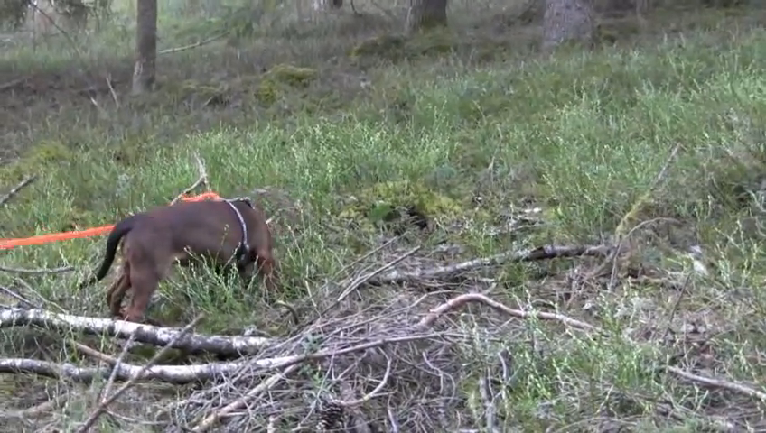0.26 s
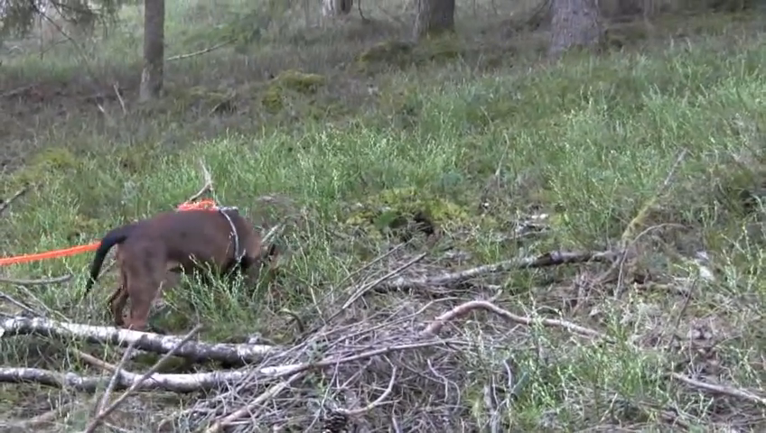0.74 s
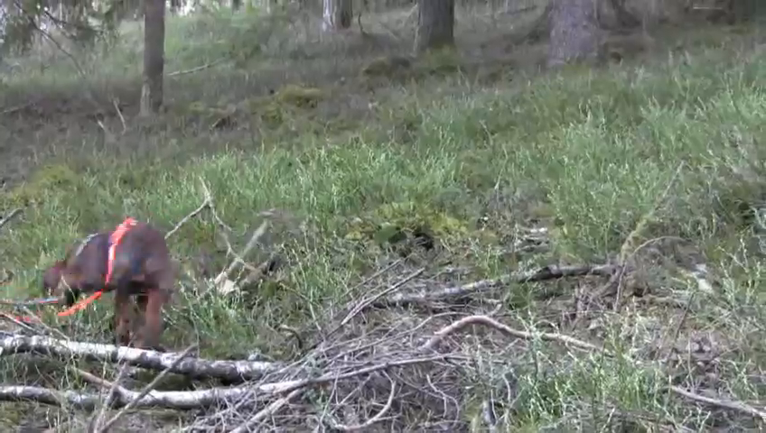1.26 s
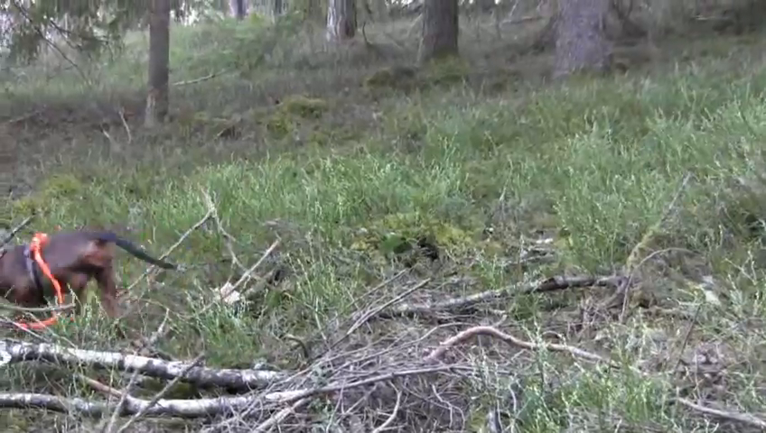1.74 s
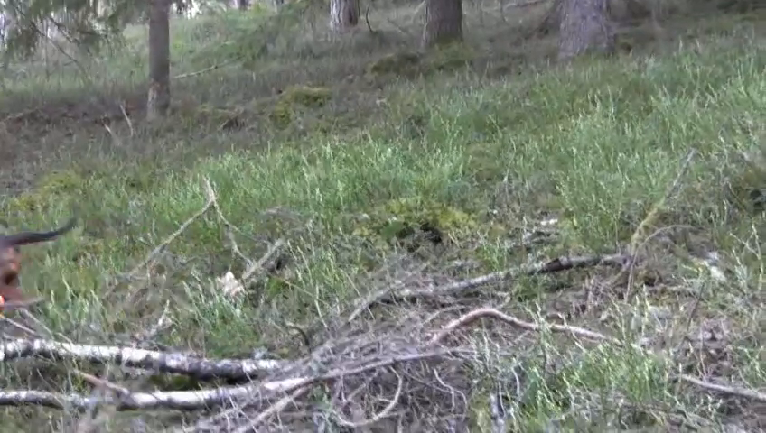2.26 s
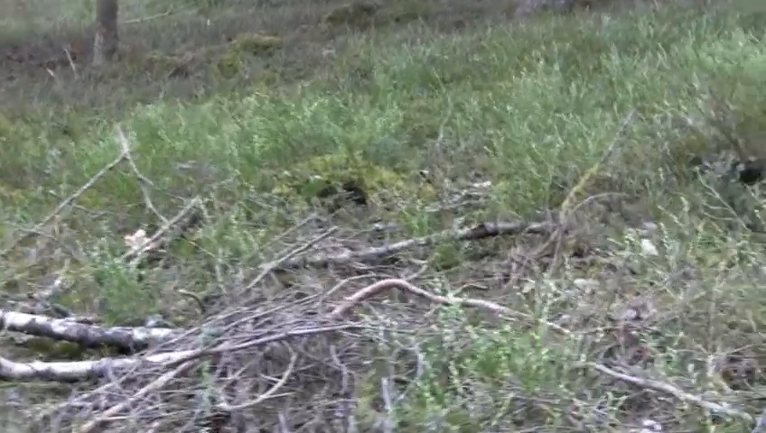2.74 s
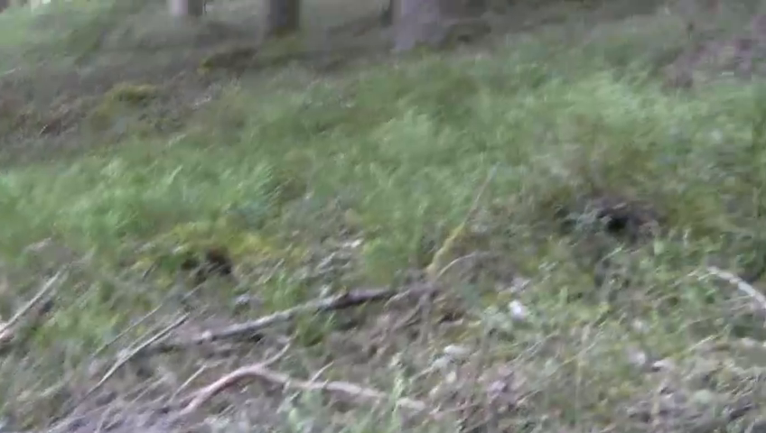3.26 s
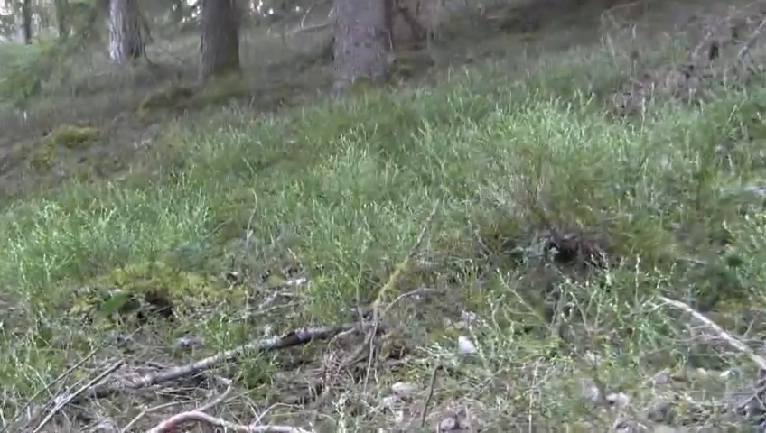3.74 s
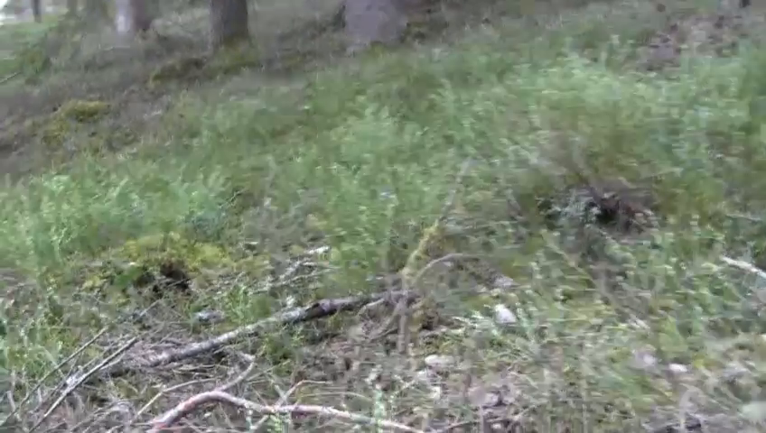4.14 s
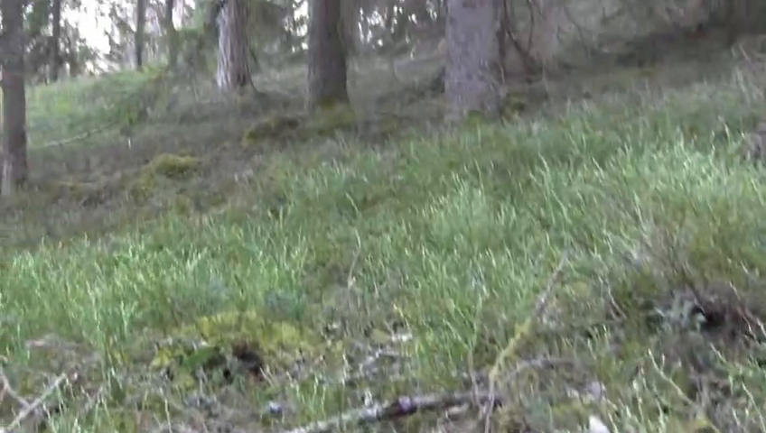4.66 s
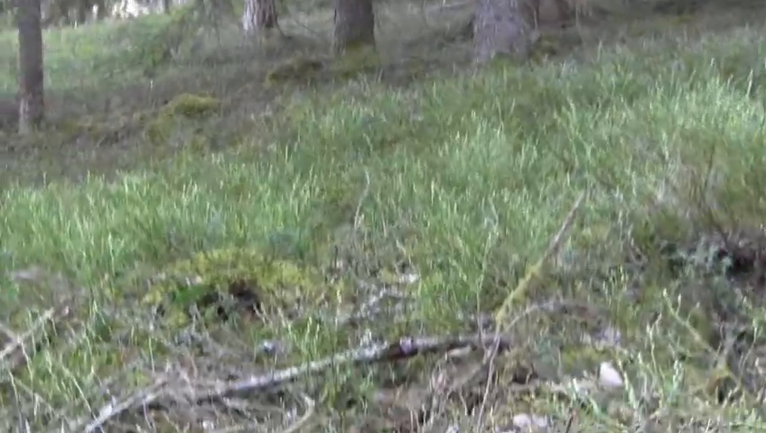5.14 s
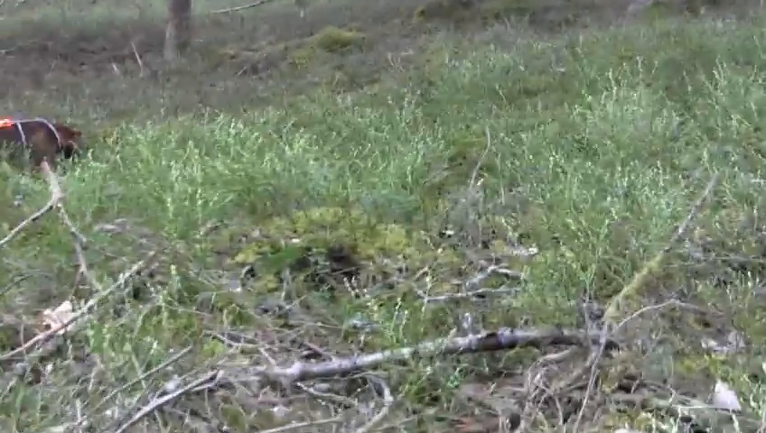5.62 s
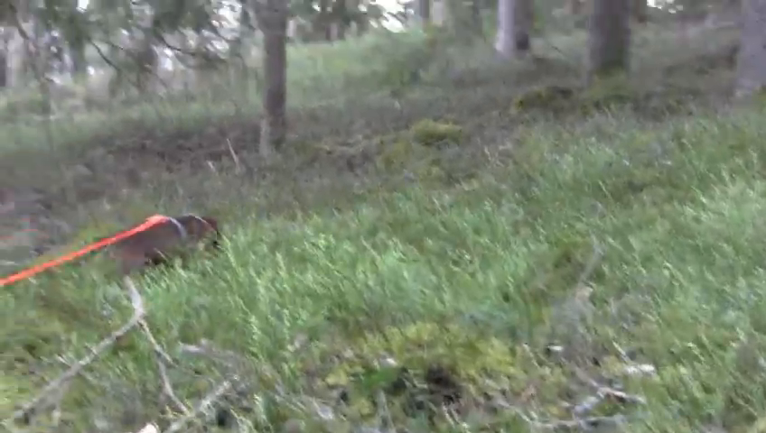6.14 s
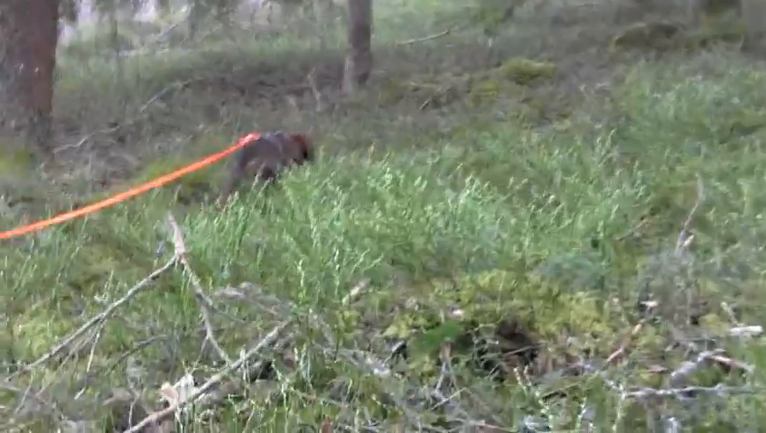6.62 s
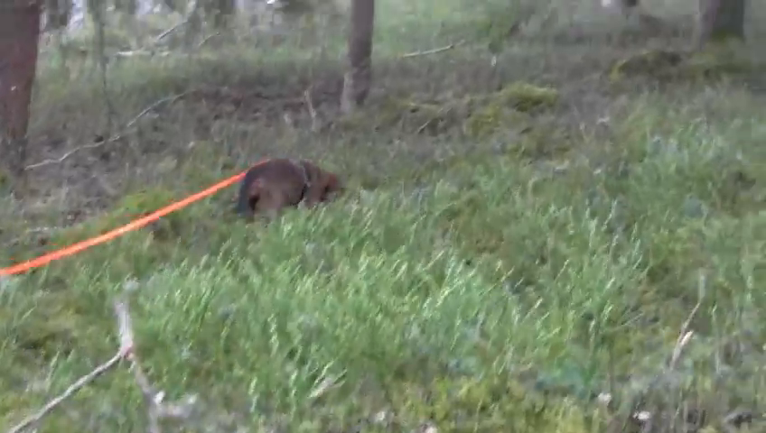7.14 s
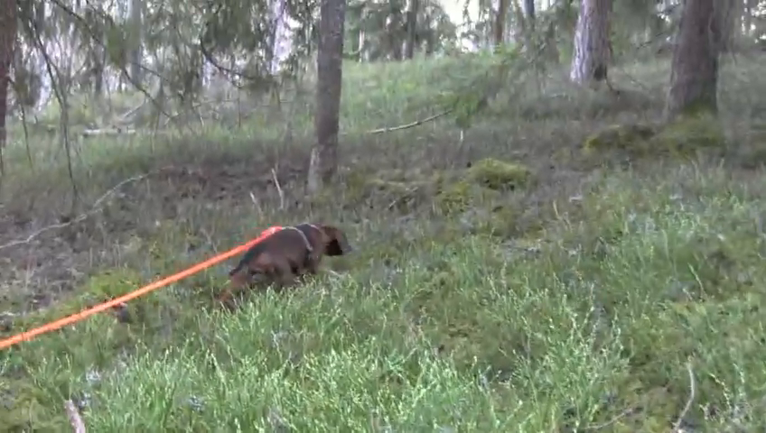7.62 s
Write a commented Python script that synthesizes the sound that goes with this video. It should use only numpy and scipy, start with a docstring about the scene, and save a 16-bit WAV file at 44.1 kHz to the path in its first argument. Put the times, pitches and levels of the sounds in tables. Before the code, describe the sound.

Footsteps push through dry forest undergrowth, with twigs snapping and grass rustling, building to busy, sharp crackles.

```python
"""In dry forest undergrowth, a walker follows a leashed dog. Twigs snap underfoot by brittle
fracture, each exciting a damped resonance. Boots and legs push through brush and grass, which
rustle by friction and many small impacts. Footfalls thud softly and three faint chirps sound
at the start. A far-off roar with a hump just below 1 kHz hangs between the trees."""
import sys
import numpy as np
from scipy import signal
from scipy.fft import rfft, irfft, next_fast_len
from scipy.io import wavfile
from scipy.ndimage import uniform_filter1d

SR = 44100
rng = np.random.default_rng(int(sys.argv[2]) if len(sys.argv) > 2 else 0)


def log_audio(samples):
    """Write samples as a 16-bit WAV file to the path given in sys.argv[1]."""
    # one column per channel
    frames = np.atleast_2d(samples).T
    # limit to full scale, then quantise
    limited = np.clip(frames, -1, 1)
    pcm = np.round(limited * 32767).astype(np.int16)
    wavfile.write(sys.argv[1], SR, pcm)


N = 347830

# Parts of a snap, low to high: a spectrum (frequency [Hz], gain [dB]), then its excitation's T60 [s]
THUMP = [(40, -54), (120, -9), (280, -1.5), (600, -5), (2000, -32)], 0.013
KNOCK = [(250, -25), (700, -0.5), (1300, 1.5), (2000, -3.5), (6000, -51.5)], 0.0083
CRACK = ([(800, -35), (2200, 4), (3400, 3), (4400, -0.5), (6000, 0), (7800, -3.5), (9000, -7),
          (16000, -53)], 0.0065)
SIZZLE = [(3000, -48), (8000, 7), (11500, 5.5), (14000, 0), (16500, -39.5)], 0.0079
def snap(responses, level_db, thump_db, knock_db, sizzle_db, ring_hz):
    """Brittle fracture: tearing fibres excite four broad bands and a damped mode of the stick."""
    t = np.arange(600) / SR
    fibres = rng.standard_normal((2, len(t))) * amp(3.13 * rng.standard_normal(len(t)))
    fibres *= 1 - np.exp(-t / 0.00025)
    fibres *= 1 + 5.0 * np.exp(-t / 0.00032)  # the first fibres break hardest
    ring_cycles, litter_loss_s = 4.2, 0.0035  # the litter cuts a low ring short
    decay = np.exp(-t * ring_hz / ring_cycles - t / litter_loss_s)
    ring = decay * (1 - np.exp(-t * ring_hz * 2)) * np.sin(2 * np.pi * ring_hz * t)
    ring_db = -1.5 + max(0.17 * knock_db, 1.25 * knock_db)  # a hollow stick rings above its knock
    thump, knock, crack, sizzle = responses
    parts = [(thump, THUMP[1], thump_db), (knock, KNOCK[1], knock_db), (crack, CRACK[1], 0),
             (sizzle, SIZZLE[1], sizzle_db), (ring[:512], CRACK[1], ring_db)]
    sound = 0
    for response, t60, part_db in parts:
        part = signal.fftconvolve(fibres * amp(-60 * t / t60), response[None], axes=1)
        sound += amp(part_db) * part / np.linalg.norm(part, axis=1, keepdims=True)
    mid, side = amp(level_db) * sound / abs(sound[0]).max()
    return stereo_pair(mid, amp(-3.5) * side)


# Breaking twigs: (time [s], level [dB], thump [dB], knock [dB], sizzle [dB], ring frequency [Hz]);
# thump, knock and sizzle are relative to the crack
SNAPS = [(0.133, -44.5, 9, -9, -25, 700), (0.249, -45.5, -25, -25, -22, 3300),
         (0.312, -41.5, -28, 0, -9.5, 2330), (0.418, -40, -11, -4, -9, 1900),
         (0.435, -43, -20, -13, -12, 3300), (1.087, -53, -27, -25, 2, 7000),
         (1.213, -46, -23, -20, 0, 6550), (1.348, -45, -27, -8, 0, 2600), (1.559, -44, -32, -24, 14, 8300),
         (1.584, -41.5, -25, -5, -2, 2600), (2.03, -37, -5.5, -6.5, -16, 2070),
         (2.205, -40.5, -26, 0, -15, 1400), (2.227, -44, -25, 5, -25, 1400),
         (2.26, -36.5, -26, -4, -7, 1410), (2.282, -41, -25, 2, -15, 5000),
         (2.314, -45.5, -25, 6, -18, 1350), (2.347, -42.5, 3, 10, -24, 2420),
         (2.387, -43, 4.5, 6, -22, 750), (2.548, -38, -26, -14, -5, 1330),
         (2.5784, -18.5, -51, -21, -9, 5420), (2.5788, -23, -55, -21, -23, 1460),
         (2.65, -38, -9, -5, -13, 2100), (2.681, -32, -14, -10, -10, 1730), (2.773, -32, -14, -1, -6, 1000),
         (2.796, -20, -6.5, -32, -2.5, 830), (2.827, -28, -47, -28, 2, 1230),
         (2.863, -34.5, -5, 4, -13, 990), (3.176, -35, -30.5, -18, 2, 1790),
         (3.254, -37.5, -32, -14, 2, 1250), (3.326, -41, -20, -4, -22, 1850),
         (3.504, -38, -3, -5, -19, 3320), (3.532, -37.5, 2.5, -8.5, -10, 2930),
         (3.595, -21.5, -4.5, -7, -9, 1330), (3.932, -35, -16, -23, -10, 1290),
         (4.05, -28.5, -16, -5, -10, 1740), (4.135, -28.5, 0, -3, -29, 820),
         (4.141, -32.5, -2.5, -10, -21, 1420), (4.279, -27, -22, -11, 5.5, 1010),
         (4.307, -32.5, -11, -9, -14, 2970), (4.372, -31.5, -12, 11, 2.5, 1540),
         (4.546, -26.5, -19, -1, -3, 3500), (4.57, -21, 0, -3, -2.5, 1640), (4.665, -21, -1.5, -7, 2, 5900),
         (4.694, -23, -3, -0.5, 1.5, 2580), (4.721, -26.5, -12, -17, -2.5, 1760),
         (4.766, -31, 2, -7, 5, 6220), (4.776, -18, -2.5, -34, 6.5, 2460),
         (4.779, -16, -7, -1.5, 6.5, 1570), (4.855, -37.5, -24, -12, -7, 2860),
         (4.979, -38, -25, -17, -13, 4430), (5.042, -31, -23, 12, -15, 1930), (5.06, -28, -19, 5, -6, 5600),
         (5.079, -28, -29, -7, -17, 2450), (5.088, -28.5, -32, -15, -18, 1200),
         (5.221, -29, -1, -10, 0.5, 4400), (5.258, -36, -40, -9, -3, 1960),
         (5.292, -29.5, -31, -7.5, -7, 1780), (5.326, -32, -13, -4.5, -4, 1220),
         (5.361, -29, -9, -26, 3.5, 3940), (5.534, -32, -12, -8, 17, 1600),
         (5.603, -36, -22, 17, -23, 2050), (5.748, -33, -14, -1, -26, 3520),
         (5.756, -21, -9.5, -34, -10, 880), (5.776, -26, -24, -5, -1, 6450),
         (5.781, -26.5, 1.5, 0.5, 3, 2900), (5.821, -26.5, -35, -16, 8, 5960),
         (5.824, -29, -40, -10, -17, 3250), (5.907, -25, -30, 0.5, -2.5, 840),
         (6.061, -32.5, -5, 22, -24, 734), (6.07, -31, 7, 6, -28, 880), (6.0786, -24.5, -2, -1.5, -19, 710),
         (6.101, -39, 2, 12, -20, 720), (6.127, -39, 0, 17, -33, 660), (6.27, -34.5, -1, 5.5, -8, 2880),
         (6.48, -25.5, -26, -14, 19, 5350), (6.529, -30, -13, -10, -4, 1370),
         (6.61, -30, -27, -11, 2, 6000), (6.633, -32, -19, -18, 1, 1450), (6.666, -31.5, -14, -9, -5, 5790),
         (6.685, -33, -20, -6, 6, 6000), (6.717, -22, -5, -3.5, 0.5, 4860),
         (6.727, -30, -28, -13, -27, 3270), (6.734, -32, -25, -20, 9, 6500),
         (6.782, -28, -6, -21, 2.5, 5530), (6.791, -30, -29, -5, -6, 2000), (6.824, -32, -7, 1, -7, 1160),
         (6.866, -35, -5, -8, -17, 2660), (6.88, -24, -15, -10, -14.5, 1390),
         (6.887, -27, 1.5, -19, -11, 3000), (6.894, -14, -14, -7.5, -12, 5860),
         (6.909, -34, -9, -24, -26, 2900), (6.934, -26.5, -13, -16, -21.5, 5930),
         (7.002, -28, -16, -26, -21, 634), (7.046, -31.5, 7, 3.5, -26, 720),
         (7.1, -32.5, 3.5, 0, -22, 1030), (7.155, -21.5, -8.5, -0.5, -5.5, 3500),
         (7.257, -38.5, -11, -9, -20, 2560), (7.704, -17.5, -17.5, -14.5, -24, 5680),
         (7.715, -33, -1, -4, -4, 1510), (7.758, -28.5, -23, -10, -4.5, 3560),
         (7.793, -31, -19, -6, 12, 1460), (7.829, -36, -9, -9, -7, 2480)]
def twigs():
    """Scattering: stems and ground add a short diffuse tail to the direct sound of each snap."""
    direct = np.zeros((2, N + 2000))
    responses = [minimum_phase(spectrum) for spectrum, _ in (THUMP, KNOCK, CRACK, SIZZLE)]
    for time, *settings in SNAPS:
        start = round(time * SR)
        sound = snap(responses, *settings)
        direct[:, start:start + sound.shape[1]] += sound
    t = np.arange(3000) / SR
    tail = rng.standard_normal(len(t)) * amp(-60 * t / 0.059) * (t > .002)
    scattered = signal.oaconvolve(direct, tail[None] / np.linalg.norm(tail), axes=1)
    return direct[:, :N] + amp(-17.0) * scattered[:, :N]


# Running rustle of legs and leash: (time [s], level [dB], low stems [dB], dry leaves [dB])
RUSTLE = [(0, -81, 12, 2), (.045, -69, 5, 7), (.17, -62.5, 2, -10.5), (.46, -60.5, -4.5, -2),
          (.65, -76, 7, -0.5), (1.04, -75, 12, -1.5), (1.3, -73, 9.5, 5), (1.9, -71, 0, 0.5),
          (2.1, -70, -2, 4.5), (2.52, -68.5, 0, 7), (2.7, -61, 1, -2.5), (3.12, -62, 1, -1),
          (3.22, -66, 2, -2.5), (3.5, -59, 1.5, -3), (3.87, -63, 2.5, -5), (4.3, -59, -2.5, -5.5),
          (4.9, -60.5, -2, -6.5), (5.21, -65.5, -8, -3), (5.32, -57, -8, 1.5), (5.65, -52.5, -3.5, -2),
          (6.02, -53, -2, -2), (6.25, -62, -15, 2), (6.57, -57, 2, 2), (6.605, -51, -13, 4.5),
          (6.94, -53, 2, 2), (7.08, -63, -7, 2), (7.33, -65, 6.5, -0.5), (7.55, -59.5, -2, -2),
          (7.89, -51.5, -1, 6.5)]
# Boot swishes: (peak time [s], level [dB], 10 dB rise [s], 10 dB fall [s], low stems [dB],
# dry leaves [dB]); rise and fall are held to at least 5 ms
SWISHES = [(0.429, -52, -0.04, 0.01, -17, -1), (1.085, -73, -0.3, 0.4, -4, 3),
           (1.461, -60, -0.02, 0.05, -7, 2), (1.484, -67, -0.03, 0.12, -4, -2), (2.19, -60, 0, 0.04, 5, 2),
           (2.275, -57.5, 0.09, 0.33, 0, -3.5), (3.92, -57.5, 0.04, 0.14, -10, 8),
           (3.997, -55, 0.1249, 0.06, 8, -1.5), (4.141, -64.5, -0.1, 1.3, 0, 5),
           (4.568, -51.5, 0.1249, 0.07, -5, 5.5), (4.777, -56, 0.01, 0.04, -1, 10),
           (4.968, -54, -0.1, 0.3, -9, -5.5), (5.067, -44.5, 0.0572, 0.04, -8, 1),
           (5.711, -47.5, -0.07, 0.04, -12, 3.5), (6.066, -48, 0, 0.13, 8, -8),
           (6.089, -48.5, 0.01, 0.03, 9.5, -8.5), (6.276, -57, -0.33, 0.4, -5, 3),
           (6.492, -49.5, 0.025, -0.02, -18, 5), (6.725, -47, -0.03, 0.06, -23, 2),
           (7.244, -68, .005, 0.4, -8, -5), (7.697, -52, 0.0659, -0.13, 1, 10.5),
           (7.844, -47.5, 0.1, 1.1, -4, -1)]
def brush_envelopes():
    """Incoherent addition: rustle and swishes sum in power, and the louder sets the timbre."""
    t = np.arange(N) / SR
    rustle_db, *rustle_tone = curves(RUSTLE)
    rustle_power = amp(rustle_db) ** 2
    power, weighted_tone = rustle_power.copy(), np.array(rustle_tone) * rustle_power
    for peak, db, rise, fall, *tone in SWISHES:
        drop_db = 10 * np.where(t < peak, (peak - t) / max(rise, .005), (t - peak) / max(fall, .005))
        swish_power = amp(db - drop_db) ** 2
        power += swish_power
        weighted_tone += np.array(tone)[:, None] * swish_power
    stems_db, leaves_db = weighted_tone / power
    swish_share = 1 - rustle_power / power
    return np.sqrt(power), stems_db, leaves_db, swish_share


# Spectrum of the rustle as heard, with a steep treble cut above 13 kHz:
# (frequency [Hz], relative spectral level [dB])
RUSTLE_SPECTRUM = [(35, -43), (60, 20), (135, -34), (242, -3), (385, -4.5), (433, -2), (1520, 0.5),
                   (5980, -5.5), (10200, -13.5), (12900, -15), (15500, -32)]
def brush(sizes=18):
    """Impact and friction: ticks, crackles and scraping drive damped modes of stems and leaves."""
    envelope, stems_db, leaves_db, swish_share = brush_envelopes()
    slow_noise = uniform_filter1d(uniform_filter1d(rng.standard_normal(N), 300), 300)
    clumps = amp(2.5 * unit_rms(slow_noise))
    crackles_per_s, ticks_per_s = 150 * clumps * (1 + 1.5 * swish_share), 260 * clumps
    crackles = (rng.random(N) < crackles_per_s / SR) / (1 + 0.69 * swish_share)
    crackles *= amp(2.6 * np.minimum(rng.exponential(1, N), 1.5))
    tearing, burst_decay = rng.standard_normal((2, N)), np.exp(-1 / (0.0017 * SR))
    log_pitch = rng.uniform(np.log(500), np.log(12000), N)
    mid_side = np.zeros((2, N))
    for hz in np.geomspace(110, 12500, sizes):
        t = np.arange(int(8 * SR / hz)) / SR
        mode = np.sin(2 * np.pi * hz * t) * np.exp(-t * hz / 1.09)
        hits, ticks = rng.random((2, N)) < ticks_per_s / SR, np.zeros((2, N))
        ticks[hits] = rng.choice([-1, 1], hits.sum())
        ticks[hits] *= amp(2.2 * np.minimum(rng.exponential(1, hits.sum()), 4))
        coupling = np.exp(-((log_pitch - np.log(hz)) / .45) ** 2)  # a crackle shakes several sizes
        bursts = tearing * signal.lfilter([1], [1, -burst_decay], crackles * coupling)
        bursts = unit_rms(bursts) * amp(0.46 * leaves_db)  # drier leaves crackle more
        scrape = rng.standard_normal((2, N)) * clumps ** (1 - .3 * swish_share)  # smoother in a swish
        force = 0.81 * unit_rms(ticks) + 0.59 * bursts + 0.96 * scrape
        grains = signal.oaconvolve(force, mode[None], axes=1)[:, :N]
        grains[1] *= amp(-np.clip(np.log2(hz / 1200) / 3, 0, 1))  # slightly narrower treble
        stem_weight = np.clip(np.log2(1500 / hz) / 0.59, 0, 1)
        leaf_weight = np.clip(np.log2(hz / 4500) / 0.3, 0, 1)
        # stems crushed in a swish sound fuller in the midrange
        crush_db = 1.5 * swish_share * np.exp(-(np.log2(hz / 1450) / 1.4) ** 2)
        band_db = at_frequency(RUSTLE_SPECTRUM, hz) + stem_weight * stems_db + leaf_weight * leaves_db
        mid_side += grains / np.std(grains[0]) * np.sqrt(hz) * amp(band_db + crush_db)
    mid_side = filtered(mid_side, [(40, -47), (70, -20), (150, -4), (12500, 3.5), (13800, -2),
                                   (14800, -17), (16000, -60)])
    level_band = signal.butter(4, [1500, 6000], "bandpass", fs=SR, output="sos")
    return envelope * stereo_pair(*mid_side) / np.std(signal.sosfilt(level_band, mid_side[0]))


# Soft footfalls and jolts: (time [s], level [dB], duration [s])
THUDS = [(0.215, -77, 0.079), (0.474, -85, 0.11), (1.969, -82, 0.11), (2.64, -72, 0.22),
         (2.858, -72.5, 0.11), (3.578, -76, 0.083), (4.275, -87, 0.1), (4.508, -78, 0.16),
         (4.68, -68, 0.069), (4.92, -77, 0.071), (5.073, -79, 0.15), (5.305, -74, 0.22), (5.438, -66, 0.11),
         (5.72, -73, 0.11), (5.882, -84, 0.13), (6.06, -78, 0.098), (6.47, -72, 0.09), (6.706, -72.5, 0.14),
         (6.873, -64, 0.055), (7.1, -77, 0.099), (7.667, -69, 0.1)]
def thuds():
    """Structure-borne sound: each jolt reaches the carried microphone as a swell of low noise."""
    spectrum = [(15, -20), (30, 5), (80, 9.5), (110, 9), (200, -38), (400, -70)]
    mid, side = filtered(rng.standard_normal((2, N)), spectrum)
    t, swell = np.arange(N) / SR, np.zeros(N)
    for start, db, duration in THUDS:
        progress = np.clip((t - start) / duration, 0, 1)
        swell += amp(db) * np.sin(np.pi * np.sqrt(progress)) ** 2
    return swell * unit_rms(stereo_pair(mid, 1.5 * side))


# Faint whistles: (time [s], duration [s], start frequency [Hz], end frequency [Hz], level [dB])
CHIRPS = [(0.094, .02, 2550, 2380, -58.5), (0.142, 0.043, 1720, 1440, -64), (.28, 0.033, 3330, 3950, -63)]
def chirps():
    """Frequency modulation: a pure tone glides linearly under a half-sine envelope."""
    t, out = np.arange(N) / SR, np.zeros(N)
    for start, duration, start_hz, end_hz, db in CHIRPS:
        progress = np.clip((t - start) / duration, 0, 1)
        hz = start_hz + (end_hz - start_hz) * progress
        out += amp(db) * np.sin(np.pi * progress) * np.sin(2 * np.pi * np.cumsum(hz) / SR)
    return out


# Spectrum of the steady background roar and hiss, with a steep treble cut above 13 kHz:
# (frequency [Hz], relative spectral level [dB])
BACKGROUND_SPECTRUM = [(30, -66), (60, -32.5), (150, -21), (420, -15.5), (650, -16), (970, -18),
                       (1700, -23), (12500, -49), (13600, -62), (14500, -73)]
# The roar's drifting hump: (time [s], centre frequency [Hz], level [dB])
ROAR_HUMP = [(0, 900, -82), (.5, 930, -68.5), (1.2, 977, -70), (2.0, 970, -73), (2.6, 895, -80),
             (7.89, 840, -72.5)]
def distant_roar(wash_db=-70.5):
    """Spectral shaping: steady broadband noise lies under a narrow band that drifts and fades."""
    wash = unit_rms(filtered(rng.standard_normal((2, N)), BACKGROUND_SPECTRUM))
    centre_hz, hump_db = curves(ROAR_HUMP)
    carrier = np.exp(2j * np.pi * np.cumsum(centre_hz) / SR)
    pole = np.exp(-np.pi * 190 / SR)  # each stage passes a band 190 Hz wide
    baseband = rng.standard_normal((2, N)) / carrier
    for _ in range(2):
        baseband = signal.lfilter([1 - pole], [1, -pole], baseband)
    common, other = amp(wash_db) * wash + amp(hump_db) * unit_rms((carrier * baseband).real)
    return np.array([common + 0.3 * other, common - 0.41 * other])


def amp(db):
    """Amplitude ratio of a level in decibels."""
    return 10 ** (np.asarray(db) / 20)


def unit_rms(x):
    """Normalisation to unit mean power."""
    return x / np.sqrt(np.mean(x ** 2) + 1e-20)


def at_frequency(spectrum, hz):
    """Interpolation on a logarithmic frequency axis."""
    frequencies, values = np.transpose(spectrum)
    return np.interp(np.log(hz + 1), np.log(frequencies + 1), values)


def curves(rows):
    """Linear interpolation of a time table's columns at every sample."""
    times, *columns = np.transpose(rows)
    return [np.interp(np.arange(N) / SR, times, column) for column in columns]


def filtered(x, spectrum):
    """Zero-phase filtering by a table of (frequency [Hz], gain [dB])."""
    size = next_fast_len(x.shape[-1])
    gain = amp(at_frequency(spectrum, np.fft.rfftfreq(size, 1 / SR)))
    return irfft(rfft(x, size) * gain, size)[..., :x.shape[-1]]


def minimum_phase(spectrum, size=1024):
    """Minimum phase: the impulse response of a spectrum whose energy arrives earliest."""
    log_gain = np.log(amp(at_frequency(spectrum, abs(np.fft.fftfreq(size, 1 / SR)))))
    return np.fft.ifft(np.exp(np.conj(signal.hilbert(log_gain)))).real[:size // 2]


# Likeness of left and right: (frequency [Hz], coherence [0-1])
COHERENCE = [(60, 0.63), (110, 0.93), (200, 0.97), (700, 0.98), (1500, 1), (4400, 0.93), (8000, 0.84),
             (14000, 0.7)]
def stereo_pair(mid, side):
    """Spatial coherence: two close ports agree in the midrange, less in deep bass and treble."""
    length = len(mid)
    size = next_fast_len(length)
    coherence = np.clip(at_frequency(COHERENCE, np.fft.rfftfreq(size, 1 / SR)), 0, 1)
    mid = rfft(mid, size) * np.sqrt((1 + coherence) / 2)
    side = rfft(side, size) * np.sqrt((1 - coherence) / 2)
    return irfft(np.array([mid + side, mid - side]), size)[:, :length]


def scene():
    """Superposition: the pressures of all sources add."""
    return twigs() + brush() + thuds() + distant_roar() + chirps()


# Direction of arrival: (time [s], lead at the left port [microseconds])
ARRIVAL_LEAD = [(0, 13), (2.1, 3.5), (3.0, 4), (3.6, 11), (4.3, -2), (4.6, 15), (4.9, 8), (4.97, 0),
                (5.14, 6), (5.2, 5), (5.95, 17.5), (6.45, 8), (6.8, -5.5), (6.9, 15), (7.89, 2)]
# Phase offset between the ports: (frequency [Hz], lead of the left port [rad])
PORT_PHASE = [(60, 0.2), (300, 0.19), (1000, 0.047)]
def record(dry, shadow_db_per_us=0.1032, cutoff_hz=16500):
    """Path difference and shadowing: the microphone's nearer port leads and is louder."""
    hz, t, spectra = signal.stft(dry, SR, nperseg=512)
    lead_us = np.interp(t, *np.transpose(ARRIVAL_LEAD))
    phase = at_frequency(PORT_PHASE, hz)[:, None] + 2 * np.pi * hz[:, None] * lead_us / 1e6
    left_gain = np.sqrt(amp(shadow_db_per_us * lead_us)) * np.exp(0.5j * phase)  # half to each port
    ports = signal.istft(spectra * np.array([left_gain, 1 / left_gain]), SR, nperseg=512)[1][:, :N]
    ports = filtered(ports, [(15, -14), (40, -4.5), (80, 1)])  # the deep bass rolls off
    lowpass = signal.firwin(511, cutoff_hz, window=("kaiser", 9), fs=SR)
    return signal.oaconvolve(ports, lowpass[None], "same")


dry = scene()
out = record(dry)
log_audio(out)
```